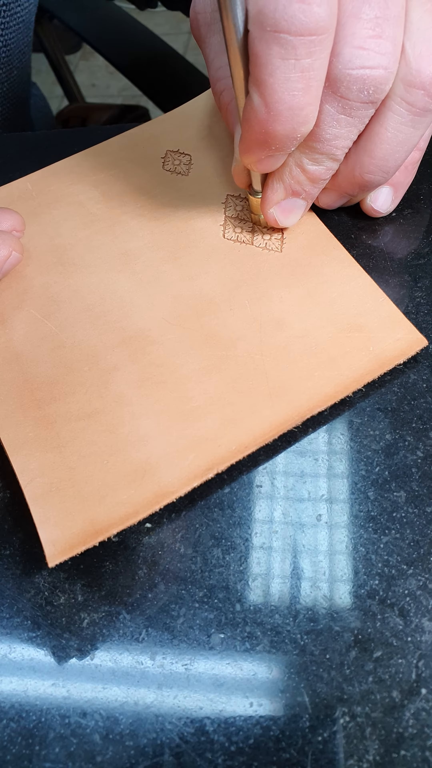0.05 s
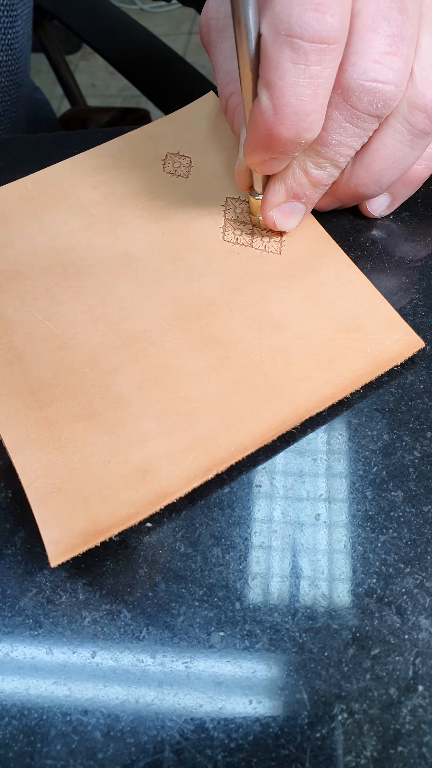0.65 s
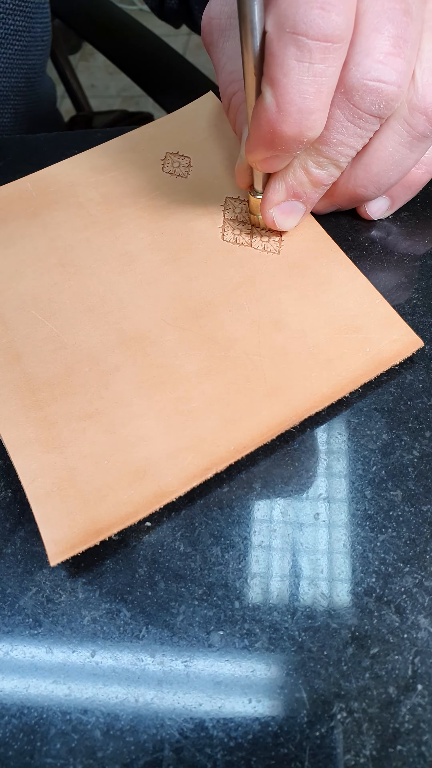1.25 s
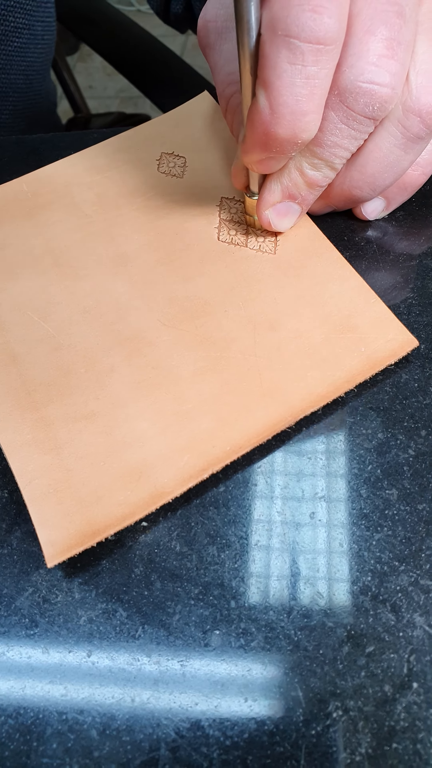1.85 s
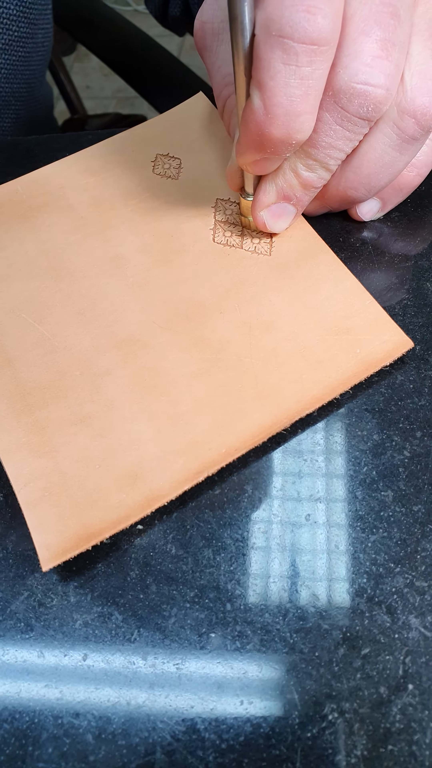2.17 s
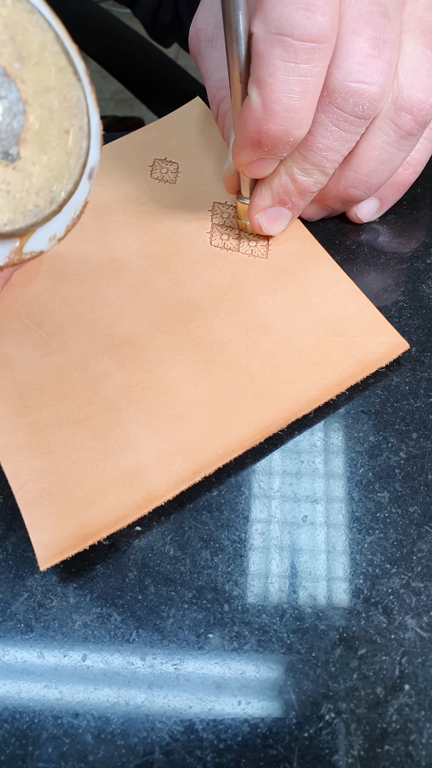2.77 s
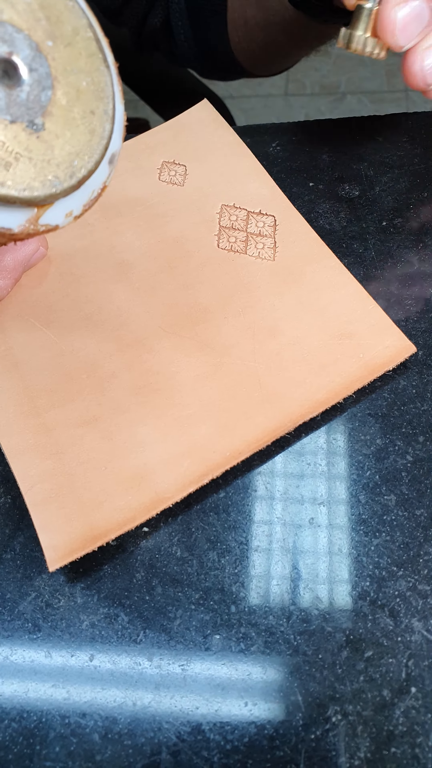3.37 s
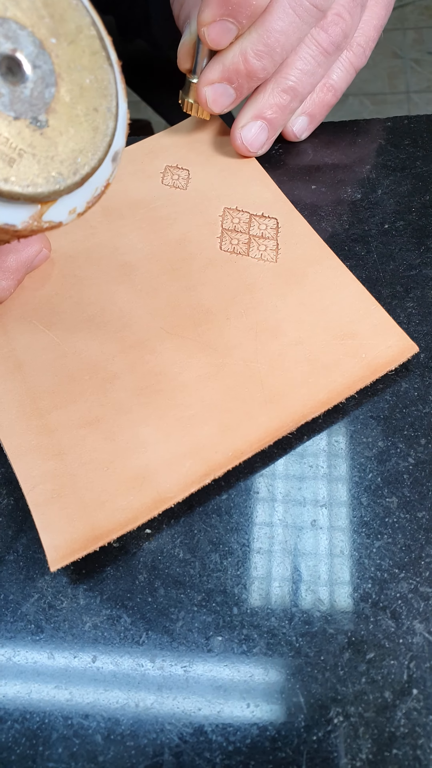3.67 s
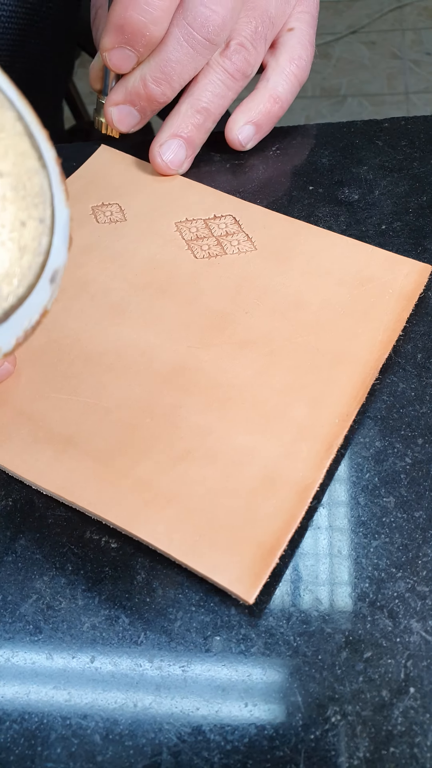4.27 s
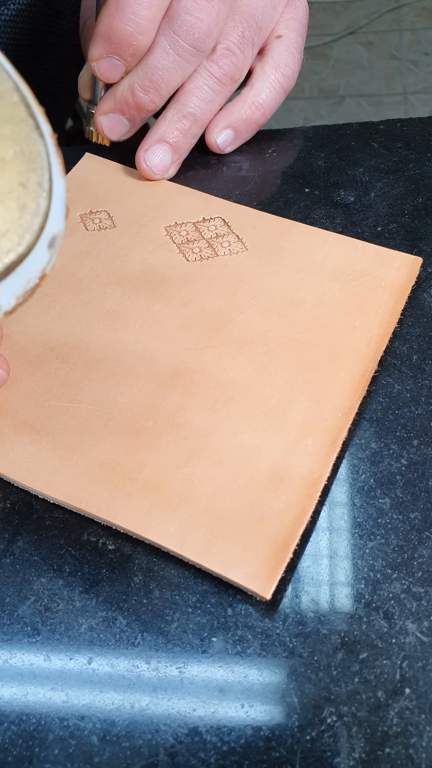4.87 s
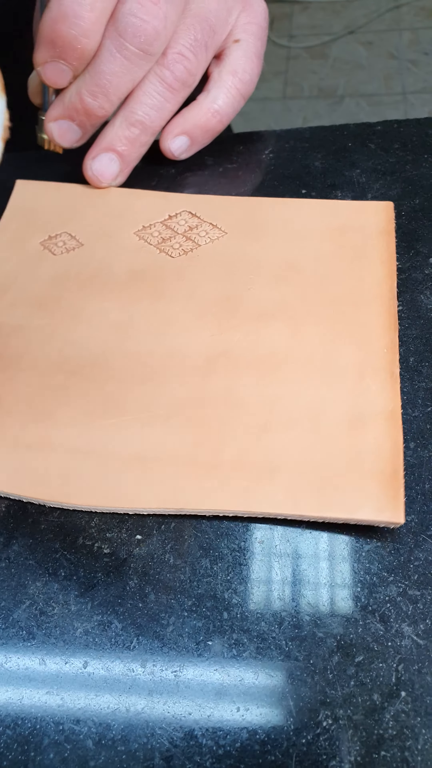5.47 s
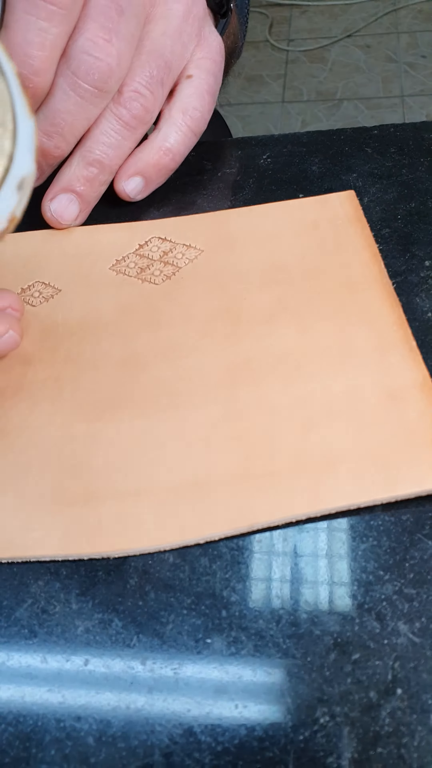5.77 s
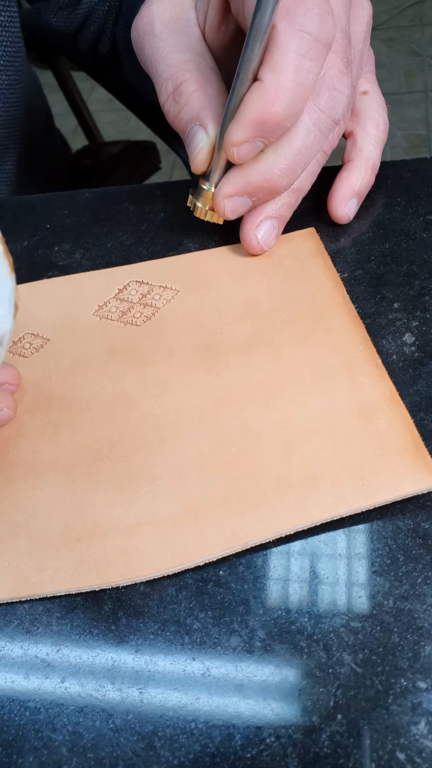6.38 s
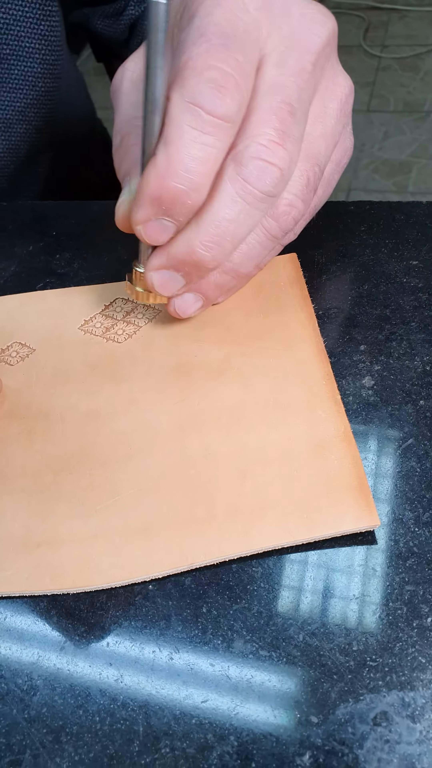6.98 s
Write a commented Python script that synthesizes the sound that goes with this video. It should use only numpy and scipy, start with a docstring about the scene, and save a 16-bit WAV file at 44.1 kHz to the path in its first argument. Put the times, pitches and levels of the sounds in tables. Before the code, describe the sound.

A mallet strikes a steel stamp into leather twice, sharp and ringing, followed by faint sliding and tapping over a fan's hum.

```python
"""A fan hums in a small workshop. A mallet is set on a steel stamp with a light clatter, then strikes it
twice, into leather on a stone slab. Each blow cracks, the stamp rings and the bench booms, so loudly
that the recorder's gain dives and creeps back. Then the leather is slid and turned on the slab, with
small taps of the tools and soft bumps on the bench. Near the end, distant hums swell and fade, the
stamp's tip ticks on the stone and fingers brush the leather."""
import sys
import numpy as np
from scipy import signal
from scipy.fft import rfft, irfft, next_fast_len
from scipy.io import wavfile
from scipy.ndimage import uniform_filter1d, minimum_filter1d, map_coordinates

SR = 44100
rng = np.random.default_rng(int(sys.argv[2]) if len(sys.argv) > 2 else 0)


def dump(signal):
    """Clip the signal to [-1, 1] and save it as 16-bit WAV at the path in sys.argv[1]."""
    limited = np.clip(np.atleast_2d(signal).T, -1, 1)
    pcm = np.round(limited * 32767).astype(np.int16)
    wavfile.write(sys.argv[1], SR, pcm)


N = 318843
TIME = np.arange(N) / SR  # seconds since the scene began
AGE = np.arange(SR) / SR  # seconds since a contact

# The tones of the slab on its bench. Each row: pitch in Hz, level in dB, seconds to fade by 60 dB (t60).
BENCH = [(35.3, -48.5, 1.1), (68.33, -43, 1.1), (104, -39, 0.18), (139.7, -37.5, 0.083),
         (183.3, -37.5, 0.8), (247.3, -30.5, 0.36), (516, -28, 0.16), (612, -30, 0.17)]
# The stamp chattering under a light touch. Each row: frequency in Hz, level in dB.
CHATTER = [(800, -22), (1500, -15), (1950, 7), (2400, 1.5), (3000, -11.5), (4500, -21.5), (7500, -25),
           (14000, -36.5)]


def blows():
    """Each blow is one hard push with a sharp crack; the mallet clacks, the stamp rings, the bench booms."""
    # Each row: start in seconds, force in dB, clack in dB, ring in dB, brightness of the ring and of the
    # contact in dB per octave, bench in dB, crack in dB, lean to the left in dB, relative contact speed.
    hits = [(1.4085, 12.5, 2.5, -6.5, 3.5, -3.5, -3, 4.5, 0.5, 0.92),
            (1.8813, 26, -16.5, -2.5, -1, -1, -1.5, 1.5, -0.76, 1.14)]
    # The stamp's push into the leather, and the contact's crack. Each row: frequency in Hz, level in dB.
    push_spectrum = [(40, 1), (120, 22), (300, 23.5), (550, 29.5), (900, 23.5), (1500, 13), (2600, 3.5),
                     (3800, 7.5), (6000, 2.5), (9000, 0.5), (15000, -11.5)]
    crack_spectrum = [(1000, -16), (2400, -2), (3200, -6), (3900, -2.5), (5000, -4), (5800, 4),
                      (8000, -9.5), (11000, -11.5), (15000, -14)]
    # The mallet's head on metal, and the stamp's steel shank, whose close pairs of tones throb slowly.
    # Each row: pitch in Hz, level in dB, fade time in seconds.
    head_tones = [(2046, -28, .09), (2210, -9, .011), (2430, -20, .014), (3000, -25, .009),
                  (3920, -16.5, .007)]
    shank_tones = [(1719, -29, .32), (1725, -42, .3), (2044, -37, .14), (3759, -35.5, .33),
                   (3767, -44, .33), (4544, -40.5, .17), (5293, -38, .16), (6562, -54, .27),
                   (8629, -55, .13), (11450, -60, .11)]
    out = np.zeros((2, N))
    for s, db, clack_db, ring_db, ring_tilt_db, tilt_db, bench_db, crack_db, left_db, speed in hits:
        # leather that is already pressed stops the stamp sooner, which raises the knock's pitch
        knock = [(hz * speed, level) for hz, level in push_spectrum]
        push = pulse(brighter(knock, tilt_db))
        clack = amp(clack_db) * ring(head_tones)
        strike = in_room(push + clack, wet_db=0)
        crack = amp(crack_db - 11) * burst(brighter(crack_spectrum, tilt_db), t60=0.007) * rise(0.00064)
        shank = amp(ring_db) * in_room(ring(shank_tones, ring_tilt_db), wet_db=-5)
        boom = amp(bench_db) * at_microphones(ring(BENCH) * rise(0.0011))
        # the push and the boom start as a drop in pressure, so they are subtracted
        blow = pan(crack, left_db=2.5) + shank - strike - pan(boom, left_db=-2.5)
        add(out, s, amp(db) * pan(blow, left_db))
    return out


def taps():
    """The tools meet with a dry click, then chatter and ring at the touch and at one bounce."""
    # Each row: start in seconds, level in dB, seconds until the bounce, then the relative levels
    # of bounce, echo and click in dB.
    touches = [(1.2613, -31, .0034, 0, 6, -14), (1.2719, -28.5, .0044, -2, 7, -12),
               (4.195, -54, 0.0056, 2, -4, 6), (4.4304, -41, .0105, 4, 0, 5), (4.869, -49, .005, -2, -5, 8)]
    # The dry click. Each row: frequency in Hz, level in dB.
    click_spectrum = [(800, -10.5), (1500, -6), (3100, 0), (3900, -10), (4500, -3.5), (7000, -14.5),
                      (14000, -24)]
    # The stamp ringing between the fingers. Each row: pitch in Hz, level in dB, fade time in seconds.
    held_tones = [(1960, 0.5, 0.059)]
    out = np.zeros((2, N))
    for s, db, flight_s, bounce_db, wet_db, click_db in touches:
        add(out, s, amp(db + click_db - 10.5) * burst(click_spectrum, t60=0.021))
        for delay, change_db in [(0, 0), (flight_s, bounce_db)]:
            touch = burst(CHATTER, t60=0.018)[0] + 1.3 * ring(held_tones)
            add(out, s + delay, amp(db + change_db - 8.5) * in_room(touch, wet_db))
    return out


def bumps():
    """A soft push of mallet or hand rings only those tones of the bench that match its speed."""
    # Each row: start in seconds, level in dB, the pitch in Hz that the push stirs most.
    pushes = [(1.251, -33.5, 510), (1.492, -16, 130), (4.841, -28, 80), (5.32, -29, 48.4),
              (6.251, -32.5, 280)]
    width_octaves, hand_t60 = 0.64, 0.43
    envelope = rise(0.03) * amp(-60 * AGE / hand_t60)  # the resting hand damps the bench
    out = np.zeros((2, N))
    for s, db, push_hz in pushes:
        tones = [(hz, -6 * (np.log2(hz / push_hz) / width_octaves) ** 2, t60) for hz, _, t60 in BENCH]
        add(out, s, amp(db) * ring(tones) * envelope)
    return out


def stamp_handling():
    """The stamp rubs lightly as it is seated and rocked, and its tip ticks on the slab."""
    # The rubs. Each row: middle in seconds, length in seconds, level in dB.
    scuffs = [(1.285, 0.041, -46), (1.35, 0.15, -57.5), (2.72, 0.25, -63), (4.895, 0.07, -61),
              (6.2, 0.38, -64.5)]
    # The ticks. Each row: start in seconds, level in dB.
    ticks = [(6.2672, -44)]
    # The ringing tip. Each row: pitch in Hz, level in dB, fade time in seconds.
    tip_tones = [(4340, 0, 0.0081), (8900, -6, 0.0064), (10060, 2, 0.0088), (13550, 1, 0.0044)]
    out = swells(scuffs) * friction(CHATTER, rough_db=2.7, rate=180)
    for s, db in ticks:
        add(out, s, amp(db) * at_microphones(ring(tip_tones)))
    return out


def leather_slide():
    """Leather pushed over stone grows louder as it speeds up, fades as it coasts, then stops."""
    # The soft hiss of its fibres. Each row: frequency in Hz, level in dB.
    suede_spectrum = [(1000, -11.5), (3000, -12.5), (4500, -5), (6000, -0.5), (9500, -9), (12000, -4),
                      (15500, -15.5)]
    fastest_s, stop_s, peak_db = 3.98, 4.42, -56
    speed_up_db_per_s, coast_db_per_s, stop_db_per_s = 59.5, 19, 150
    since = TIME - fastest_s
    moving_db = np.minimum(speed_up_db_per_s * since, -coast_db_per_s * since)
    braking_db = stop_db_per_s * np.maximum(TIME - stop_s, 0)
    hiss = friction(suede_spectrum, rough_db=1.3, rate=130)
    return pan(amp(peak_db + moving_db - braking_db) * hiss, left_db=-4.5)


def finger_brushes():
    """Skin catches and slips on the leather in short, grainy strokes."""
    # Each row: middle in seconds, length in seconds, level in dB.
    strokes = [(6.435, .02, -62), (6.489, 0.087, -53), (6.633, 0.031, -60), (7.217, 0.094, -52.5)]
    # The hiss of skin. Each row: frequency in Hz, level in dB.
    skin_spectrum = [(1500, -1), (3500, -12), (4600, -5), (7400, 0.5), (9500, -5), (12500, 2),
                     (15500, -9.5)]
    return pan(swells(strokes) * friction(skin_spectrum, rough_db=2.3, rate=500), left_db=-7)


def fan():
    """The fan hums with several wavering tones."""
    # Each row: pitch in Hz, level at first in dB, level at the end in dB.
    tones = [(84.3, -63.5, -61.5), (169.4, -63, -61), (292, -58, -61), (369.4, -55.5, -67.5),
             (396.4, -65, -60.5), (725, -75.5, -72.5), (885, -73, -71), (2850, -82.5, -82)]
    hum = sum(amp(np.linspace(first_db, last_db, N)) * wavering_tone(hz) for hz, first_db, last_db in tones)
    return pan(hum, left_db=-0.5)


def distant_hums():
    """Far-off hums swell and fade."""
    # Each row: middle in seconds, length in seconds, level in dB, pitch in Hz.
    hums = [(5.8, .4, -51, 113), (6.3, 0.32, -45, 114), (6.724, 1, -49, 64.5), (6.906, 0.38, -65, 745)]
    return sum(swells([(s, length, db)]) * wavering_tone(hz) for s, length, db, hz in hums)


def air():
    """The workshop's air makes a steady, low rush."""
    # Each row: frequency in Hz, level in dB.
    air_spectrum = [(25, -4), (70, 0.5), (140, -4.5), (400, -7), (520, -9.5), (750, -16), (1700, -21),
                    (2600, -28.5), (5200, -35.5), (7300, -30.5), (9400, -37.5), (12000, -32.5),
                    (15500, -31.5)]
    return pan(amp(-49) * unit(diffuse(air_spectrum, N)), left_db=-0.77)


def in_room(x, wet_db):
    """A short sound reaches the two microphones, followed by the workshop's echo, set by wet_db."""
    # The echo's strength. Each row: frequency in Hz, level in dB.
    echo_spectrum = [(50, 2), (150, 3.5), (330, -8.5), (700, -14), (1400, -10.5), (2100, -11), (3200, -8),
                     (4500, -8.5), (7000, -10.5), (10000, -11), (15000, -19.5)]
    # The echo's length. Each row: frequency in Hz, fade time in seconds.
    echo_times = [(80, 0.74), (250, 0.36), (1000, 0.41), (2600, 0.28), (4500, 0.37), (8000, 0.27),
                  (14000, .14)]
    hz, t, bands = signal.stft(diffuse(echo_spectrum, SR), SR, nperseg=256)
    t60 = along(echo_times, hz)[:, None]
    fade = amp(-60 * t / t60) * np.sqrt(np.log(1e6) / (t60 * SR))  # a longer fade adds no energy
    tail = signal.istft(bands * fade, SR, nperseg=256)[1][:, :SR]
    echo = signal.fftconvolve(x[None], tail, axes=1)[:, :SR]
    return at_microphones(x) + amp(wet_db) * echo


def at_microphones(x):
    """The direct sound reaches the left microphone slightly ahead of the right."""
    # Each row: frequency in Hz, the left side's lead in radians.
    left_lead = [(60, .2), (250, 0.2), (550, .35), (1100, 0.73), (2000, 1), (3800, 1.3), (5200, 0.88),
                 (8000, 0.7), (14000, 2.1)]
    return np.array([x, filtered(x, lambda hz: np.exp(-1j * along(left_lead, hz)))])


def diffuse(spectrum, n):
    """Noise from all around, alike in both ears in the bass only."""
    # Each row: frequency in Hz, likeness of left and right (1 means the same).
    likeness = [(60, .97), (130, .93), (290, .8), (640, 0.07), (1410, -0.24), (3100, -.1), (7000, 0)]

    def response(hz):
        angle = np.arccos(np.clip(along(likeness, hz), -1, 1)) / 2
        return amp(along(spectrum, hz)) * [np.cos(angle), np.sin(angle)]

    mid, side = filtered(rng.standard_normal((2, n)), response)
    return np.array([mid + side, mid - side])


def pulse(spectrum):
    """The shortest pulse with this spectrum that makes no sound before it is struck."""
    log_spectrum = np.log(amp(along(spectrum, np.fft.rfftfreq(SR, 1 / SR))))
    cepstrum = irfft(log_spectrum)
    # folding the second half onto the first packs the energy at the start
    cepstrum[1:SR // 2] *= 2
    cepstrum[SR // 2:] = 0
    return irfft(np.exp(rfft(cepstrum)))


def ring(tones, tilt_db=0, scatter_db=1):
    """A struck object's tones die away, at slightly new strengths for each contact."""
    pivot_hz = np.median([tone[0] for tone in tones[:3]])
    out = np.zeros(SR)
    for hz, db, t60 in tones:
        start_db = db + tilt_db * np.log2(hz / pivot_hz) + scatter_db * rng.standard_normal()
        out += amp(start_db - 60 * AGE / t60) * np.sin(2 * np.pi * hz * AGE)
    return out


def burst(spectrum, t60):
    """A rough contact makes noise that dies at once."""
    return unit(diffuse(spectrum, SR)) * amp(-60 * AGE / t60)


def friction(spectrum, rough_db, rate):
    """Surfaces catch and slip, making noise whose level flickers about rate times a second."""
    return unit(diffuse(spectrum, N) * amp(rough_db * wobble(rate)))


def wavering_tone(hz, drift_radians=0.3, flutter_db=2.5):
    """A tone that wanders a little in pitch and level."""
    phase = 2 * np.pi * hz * TIME + drift_radians * wobble(5)
    return unit(np.sin(phase) * amp(flutter_db * wobble(11)))


def brighter(spectrum, tilt_db):
    """A harder contact lifts the treble by tilt_db an octave; below 0 it dulls it."""
    return [(hz, db + tilt_db * max(np.log2(hz / 3500), 0)) for hz, db in spectrum]


def swells(rows):
    """Bell-shaped rises and falls in level."""
    return sum(amp(db) * np.exp(-(2 * (TIME - s) / length) ** 2) for s, length, db in rows)


def rise(seconds):
    """A smooth onset from 0 towards 1."""
    return 1 - np.exp(-AGE / seconds)


def wobble(rate):
    """A smooth curve through rate random points a second."""
    return map_coordinates(rng.standard_normal(int(N * rate / SR) + 4), [TIME * rate])


def amp(db):
    """Turn decibels into a multiplier."""
    return 10 ** (np.asarray(db) / 20)


def unit(x):
    """Scale a sound to an average power of 1."""
    return x / np.sqrt(np.mean(x ** 2) + 1e-20)


def along(points, hz):
    """Read between a table's rows, with the octaves evenly spaced."""
    frequencies, values = np.transpose(points)
    return np.interp(np.log(hz + 1), np.log(frequencies), values)


def filtered(x, response):
    """Multiply each frequency in a sound by response(hz)."""
    n = x.shape[-1]
    padded = next_fast_len(n + 8192)
    return irfft(rfft(x, padded) * response(np.fft.rfftfreq(padded, 1 / SR)), padded)[..., :n]


def add(track, s, sound):
    """Mix a sound into a track from s seconds on."""
    part = track[..., round(s * SR):][..., :sound.shape[-1]]
    part += sound[..., :part.shape[-1]]


def pan(x, left_db):
    """Lean a sound to the left (or right, below 0)."""
    return x * amp([[left_db / 2], [-left_db / 2]])


def gain_control(x, ceiling_db, slope, release_s):
    """A loud sound pulls the gain down at once; the gain then creeps back."""
    power = np.abs(uniform_filter1d(np.mean(x ** 2, axis=0), size=132))
    excess_db = slope * np.maximum(10 * np.log10(power + 1e-12) - ceiling_db, 0)
    fade = np.exp(-TIME / release_s)
    gain_db = -np.maximum.accumulate(excess_db / fade) * fade
    smooth_db = uniform_filter1d(minimum_filter1d(gain_db, size=89), size=89)
    return x * amp(smooth_db)


def scene():
    """The blows, the small handling sounds and the workshop around them."""
    work = blows() + taps() + bumps() + stamp_handling() + leather_slide() + finger_brushes()
    return work + air() + fan() + distant_hums()


def record(dry):
    """Turn down the loud moments, round off the peaks and cut the highest treble."""
    x = gain_control(dry, ceiling_db=-6.0, slope=1.16, release_s=1.292)
    x = x / (1 + x ** 8) ** (1 / 8)
    return filtered(x, lambda hz: hz < 15850)


dry = scene()
out = record(dry)
dump(out)
```